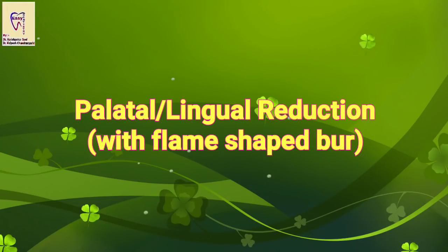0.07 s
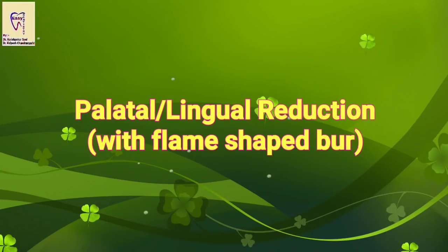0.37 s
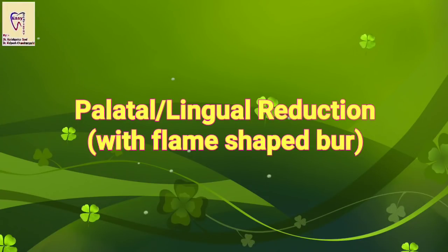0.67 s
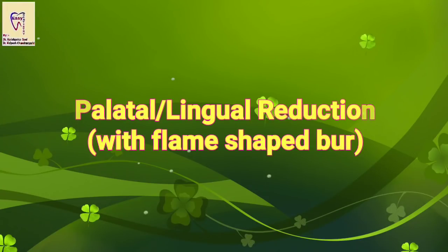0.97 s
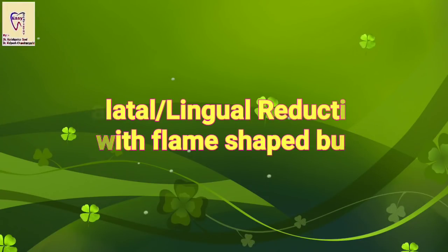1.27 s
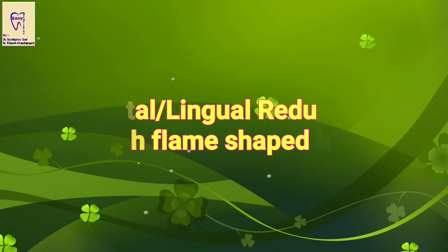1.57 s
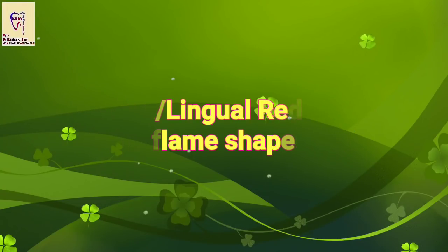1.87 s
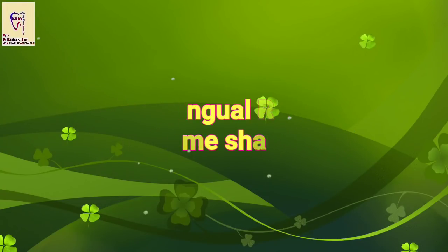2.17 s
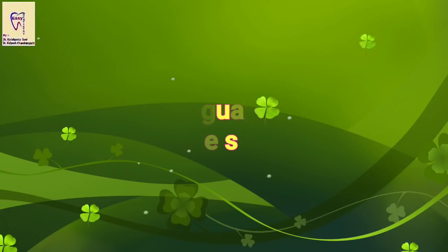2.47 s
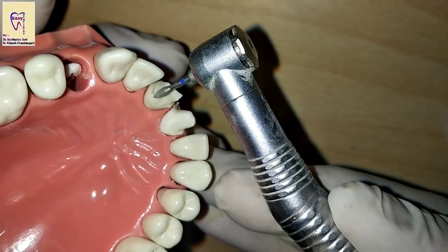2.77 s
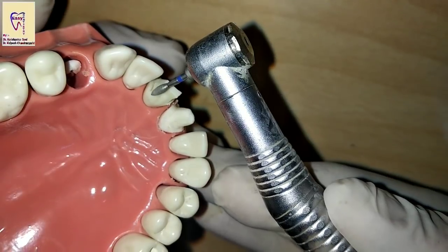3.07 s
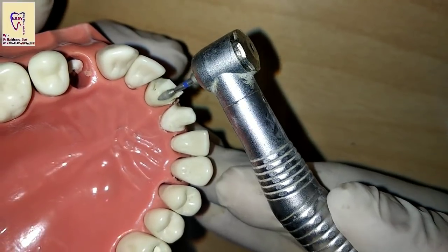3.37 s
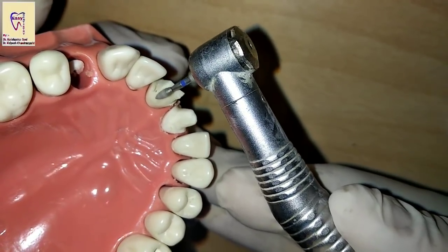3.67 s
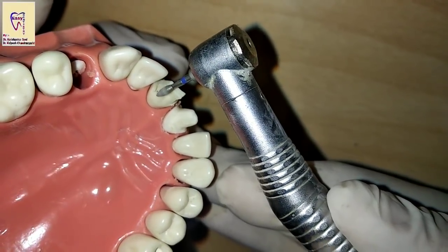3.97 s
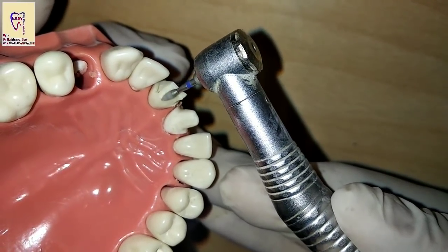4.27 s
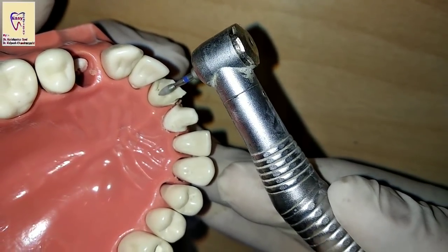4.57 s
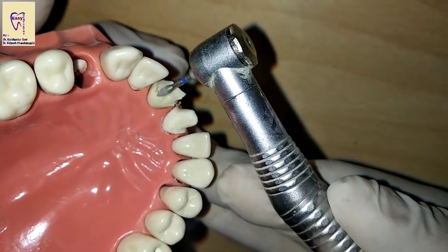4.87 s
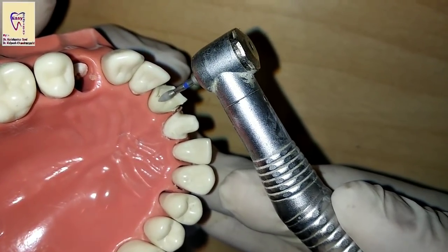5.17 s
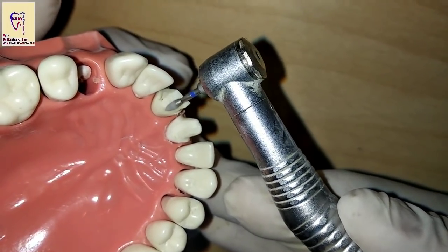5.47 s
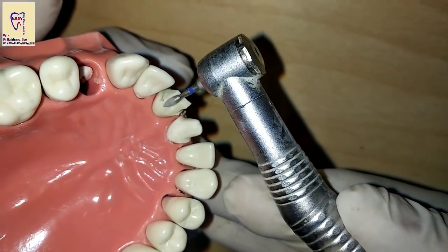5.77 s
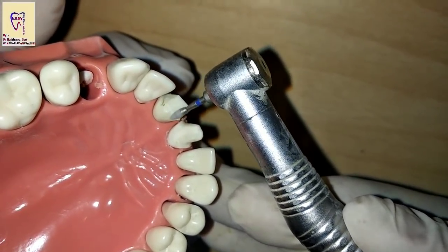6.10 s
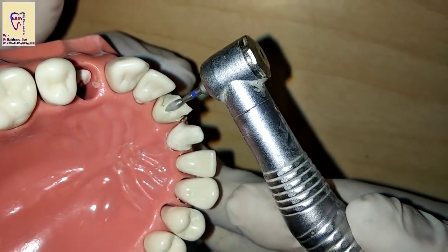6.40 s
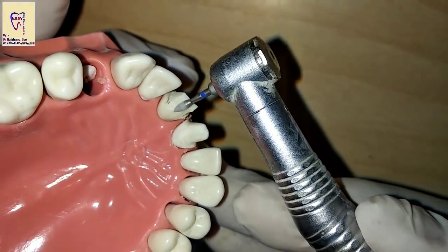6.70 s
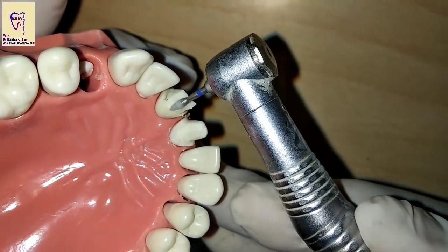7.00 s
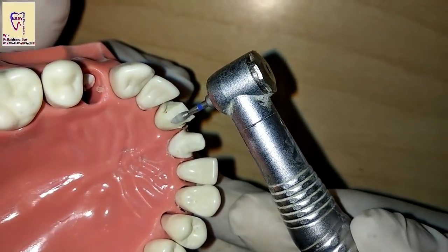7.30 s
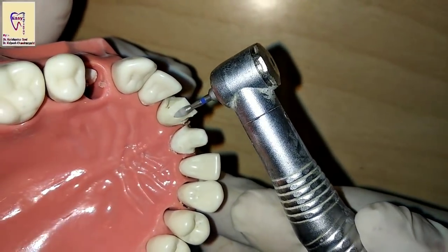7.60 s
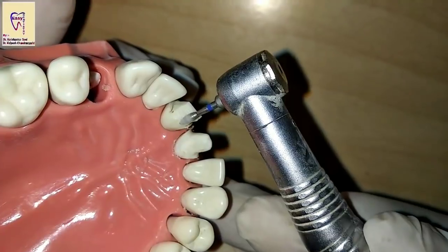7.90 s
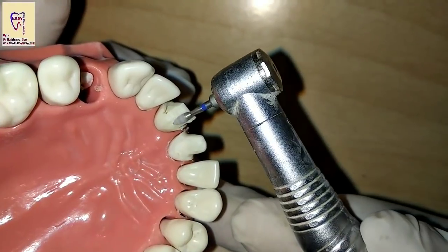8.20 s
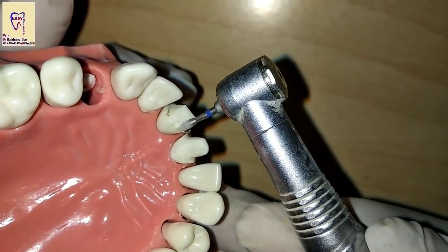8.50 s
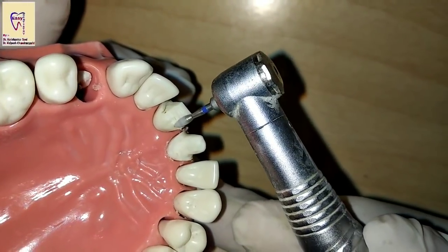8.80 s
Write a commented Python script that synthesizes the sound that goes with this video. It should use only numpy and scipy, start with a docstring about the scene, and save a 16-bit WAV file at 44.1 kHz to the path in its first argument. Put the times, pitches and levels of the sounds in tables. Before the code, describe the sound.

Close up in a small room, a faint hum and a few soft thumps give way to a dental drill spinning up with a loud, whistling hiss of air. Its high, wavering whine dips and recovers again and again, with brief squeals, as the bur scrapes a plastic model tooth. The hiss eases and the cutting becomes a harsh, rattling grind, with a low hum and rumble underneath at the end.

```python
"""A machine hums, with soft low thumps and a faint rustle; then an air-turbine dental handpiece spins up
and grinds a plastic tooth in a model jaw, close by in a small room. Rotor unbalance gives a whine that
sags each time the bur is pressed on, sweeping through the resonances of the metal head and flaring
briefly. Turbulent exhaust air hisses and whistles, impacts of grit excite the modes of tooth and jaw,
and the bur rattles. The hum fades before the drill starts and returns near the end."""
import sys
import numpy as np
from scipy import signal
from scipy.fft import rfft, irfft
from scipy.io import wavfile
from scipy.ndimage import uniform_filter1d

SR = 44100
rng = np.random.default_rng(int(sys.argv[2]) if len(sys.argv) > 2 else 0)


def store_pcm(level_fs):
    """Save levels as 16-bit WAV."""
    pcm = np.round(np.clip(level_fs, -1, 1) * 32767).astype(np.int16)
    wavfile.write(sys.argv[1], SR, np.atleast_2d(pcm).T)


N = 390285
TIME = np.arange(N) / SR


def undb(db):
    """Decibels to amplitude ratio."""
    return 10 ** (np.asarray(db) / 20)


def unit(x):
    """Normalisation to rms 1."""
    return x / np.sqrt(np.mean(x ** 2))


def curve(table, at=TIME):
    """Linear interpolation of a two-column table, by default over time."""
    return np.interp(at, *np.transpose(table))


def walk(rate):
    """Random modulation of rms 1, about rate turns a second."""
    levels = rng.standard_normal(N // 20)
    return unit(np.interp(2 * rate * TIME, np.arange(len(levels)), levels))


def colour(x, points):
    """Spectral shaping by (f/Hz, level/dB) points, rolled off below the first; rms 1."""
    hz, db = np.transpose(points)
    bins = np.maximum(np.arange(N // 2 + 1) * SR / N, 1)
    skirt = 1 / (1 + (hz[0] / bins) ** 3)
    gain = undb(np.interp(np.log(bins), np.log(hz), db))
    return unit(irfft(rfft(x) * skirt * gain, N))


def resonator(x, hz, width):
    """Second-order resonance with unit gain at its centre."""
    return signal.lfilter(*signal.iirpeak(hz, hz / width, SR), x)


def ring(x, modes):
    """Modal superposition: the direct sound plus each resonance it excites."""
    return x + sum(undb(db) * resonator(x, hz, width) for hz, width, db in modes)


def band(hz, width):
    """Narrow-band noise from two equal resonators in cascade; rms 1."""
    once = resonator(rng.standard_normal(N), hz, width)
    return unit(resonator(once, hz, width))


def grit(per_s, spread_db):
    """Shot noise: tiny impacts at random moments, most weak and a few strong."""
    hits = rng.random(N) < per_s / SR
    return unit(hits * rng.standard_normal(N) * undb(spread_db * rng.standard_normal(N)))


def shifting(x, spread_db, per_s, size):
    """Random spectral modulation: each narrow band swells and fades on its own; rms 1."""
    frames = dict(fs=SR, nperseg=size, noverlap=size * 3 // 4)
    _, t, bands = signal.stft(x, **frames)
    memory = np.exp(-2 * np.pi * per_s * t[1])
    kicks = uniform_filter1d(rng.standard_normal(bands.shape), size=3, axis=0)
    drift = unit(signal.lfilter([1], [1, -memory], kicks))
    gain = undb(spread_db * np.minimum(drift, 2))
    return unit(signal.istft(bands * gain, **frames)[1][:N])


# harmonics of the machine's shaft: order, level/dB
HUM_ORDERS = [(11, -8), (12, -8.5), (13, -9.5), (14, -22.5), (16, -35), (17, 6.5), (18, 7.5), (19, 2),
              (21, -5.5), (22, -6), (23, -32), (32, -38), (39, -41), (46, -49)]
# hum envelope: t/s, level/dB
HUM_LEVEL = [(0, -46), (.1, -44), (.36, -44.5), (.43, -50.5), (.55, -55.5), (.855, -56), (.865, -91),
             (1.0, -72), (1.4, -67), (7.55, -84), (7.75, -45.5), (7.95, -39.5), (8.3, -34), (8.85, -38.5)]

def hum(shaft_hz=22.47):
    """Periodic motion: a slow machine drones on harmonics of its shaft rate."""
    turn = 2 * np.pi * shaft_hz * TIME
    # odd harmonics lead by a quarter cycle, so the drone warbles more than it throbs
    drone = sum(undb(db) * np.sin(order * turn + order % 2 * np.pi / 2) for order, db in HUM_ORDERS)
    return unit(drone) * undb(curve(HUM_LEVEL) + 1.3 * walk(18))


# ambient spectrum: f/Hz, level/dB
ROOM_SPECTRUM = [(380, 3.5), (650, -6.5), (961, -12), (995, -31), (1040, -3), (1110, -14.5), (2390, -20.5),
                 (2920, -18), (3140, -20), (4980, -15.5), (5870, -31), (8890, -20.5), (11000, -43),
                 (14300, -77), (22000, -120)]
# ambient envelope: t/s, level/dB
ROOM_LEVEL = [(0, -63), (.46, -65), (.85, -65), (.87, -84), (.92, -82)]

def ambience():
    """Broadband noise floor of the quiet room."""
    noise = shifting(colour(rng.standard_normal(N), ROOM_SPECTRUM), spread_db=2, per_s=8, size=1024)
    return noise * undb(curve(ROOM_LEVEL) + 3.8)


# rumble spectrum: f/Hz, level/dB
RUMBLE_SPECTRUM = [(25, -54), (70, -56), (100, -5), (135, 2), (250, 2.5), (340, 1.5), (600, -8),
                   (1200, -80), (4000, -68)]
# rumble envelope: t/s, level/dB
RUMBLE_LEVEL = [(0.0, -58), (0.38, -68), (0.5, -73), (0.92, -101), (1.0, -59), (1.27, -44.5), (1.35, -69),
                (1.58, -85), (1.68, -49), (1.88, -53), (1.95, -102), (2.25, -100), (2.45, -55),
                (4.2, -57.5), (6.5, -57), (7.6, -54.5), (7.9, -33.5), (8.85, -42.5)]

def rumble():
    """Low-frequency noise of air and handling; the thud of each dig adds to it in power."""
    gain = np.hypot(undb(curve(RUMBLE_LEVEL)), dig_envelope(THUD_COLUMN)) * undb(2.2 * walk(25))
    noise = colour(rng.standard_normal(N), RUMBLE_SPECTRUM)
    return shifting(noise, spread_db=6.5, per_s=4.7, size=2048) * gain


# rustle spectrum: f/Hz, level/dB
RUSTLE_SPECTRUM = [(1500, -5), (2300, -2), (3200, -5), (5000, 3), (5900, -5), (7500, -13), (11000, -40)]
# rustle envelope: t/s, level/dB
RUSTLE_LEVEL = [(0, -64), (.12, -63), (.17, -71), (.27, -64), (.36, -64), (.45, -78), (.6, -110)]

def rustle():
    """Faint shot noise of handling as the handpiece is brought into place."""
    ticks = colour(grit(per_s=3000, spread_db=3), RUSTLE_SPECTRUM)
    flicker = shifting(ticks, spread_db=7, per_s=12, size=512)
    return flicker * undb(curve(RUSTLE_LEVEL) + 2 * walk(30))


# soft low thumps: t/s, level/dB, f/Hz
THUMPS = [(.01, -40, 218), (0.071, -38, 239), (0.271, -48, 247), (.79, -60, 156), (0.977, -51, 214),
          (1.08, -40, 152), (1.238, -58, 162), (1.422, -65, 153), (4.64, -34.5, 150), (4.861, -48, 145.3),
          (5.21, -35.5, 158), (6.772, -40, 120), (6.98, -46, 117), (7.272, -44, 123.4)]

def thumps(rise_s=0.006, t60=0.24):
    """Damped oscillation: each soft thump is one low, exponentially decaying tone."""
    out = np.zeros(N)
    for s, db, hz in THUMPS:
        age = np.maximum(TIME - s, 0)
        attack = 1 - np.exp(-age / rise_s)
        decay = undb(db - np.minimum(60 * age / t60, 200))
        out += attack * decay * np.sin(2 * np.pi * hz * age)
    return out


# hose modes: f/Hz, width/Hz, level/dB
HOSE_MODES = [(1690, 160, -0.5), (2390, 63, 0), (2690, 90, -7), (4200, 82, 3), (4950, 230, 0.5)]
# hose envelope: t/s, level/dB
HOSE_LEVEL = [(.9, -100), (.94, -60), (1.05, -35.5), (1.28, -42), (1.42, -50), (1.6, -100)]

def hose():
    """Air-column resonance: the hose rings hollow as it fills."""
    modes = sum(undb(db) * band(hz, width) for hz, width, db in HOSE_MODES)
    return unit(modes) * undb(curve(HOSE_LEVEL))


# jet spectrum: f/Hz, level/dB
AIR_SPECTRUM = [(300, -21.5), (700, -9.5), (1100, -17.5), (1700, -3.5), (2400, -12.5), (3100, -10),
                (4200, -3.5), (5400, -15.5), (6600, -6), (7400, -5), (7900, 7), (9200, 6.5), (10000, 0),
                (11200, -22)]
# air flow through the head: t/s, level/dB
AIR_LEVEL = [(0.905, -85), (0.925, -54), (1.0, -35), (1.2, -27), (2.2, -26), (3.1, -23.5), (3.33, -26.5),
             (3.42, -33), (6.6, -33), (6.76, -37), (6.95, -35.5), (8.85, -39)]

def exhaust(load, stall_db=4.5):
    """Turbulent jet noise: more air spills from the head as the rotor slows."""
    jet = shifting(colour(rng.standard_normal(N), AIR_SPECTRUM), spread_db=3.2, per_s=16, size=512)
    gust_db = .7 * walk(30)
    return jet * undb(curve(AIR_LEVEL) + stall_db * load - 3 + gust_db)


# modes of the head's air passages: f/Hz, width/Hz, level/dB
PORT_MODES = [(2145, 60, -4), (2315, 90, 0), (3550, 90, -2), (3690, 50, -4), (3960, 120, -3),
              (4220, 60, -8), (4410, 60, -6), (4660, 70, -10), (5580, 70, -16)]
# their envelope: t/s, level/dB
PORTS_LEVEL = [(.92, -77.5), (1.2, -37.5), (1.5, -32.5), (3.0, -35.5), (3.5, -43), (4.0, -49.5),
               (8.85, -41.5)]

def ports():
    """Cavity resonance: the flow rings the passages of the head."""
    modes = sum(undb(db + 2.5 * walk(8.8)) * band(hz, width) for hz, width, db in PORT_MODES)
    return unit(modes) * undb(curve(PORTS_LEVEL))


# whistle envelope: t/s, level/dB
WHISTLE_LEVEL = [(.92, -84), (1.05, -52), (1.35, -43), (1.55, -36.5), (1.85, -33), (2.1, -37), (3.1, -39),
                 (3.4, -48.5), (8.85, -53)]

def whistle():
    """Narrow-band flow noise: air leaving the head gives a breathy pitch."""
    return band(hz=6935, width=230) * undb(curve(WHISTLE_LEVEL) + 2.1 * walk(12))


FREE_HZ = 4685  # unloaded rotor speed
# presses of the bur: deepest t/s, sag/Hz, lean-in/s, ease-off/s, whine gain/dB, contact/dB, overtones/dB
PRESSES = [(3.312, 1501, 0.203, 0.13, 11.5, -67, -65), (3.66, 84.9, .11, .11, 0, -60, -66),
           (4.25, 1516, 0.3, 0.092, 4, -49, -71), (4.657, 1775, 0.17, 0.13, -10, -61, -52),
           (5.067, 1445, 0.19, 0.096, 0, -67, -56), (5.47, 1455, 0.31, 0.09, -2.5, -45, -49.5),
           (5.892, 540.0, 0.079, 0.041, 10, -58, -66), (6.107, 3408, 0.35, 0.11, 0, -63, -61.5),
           (6.809, 3201, 0.27, 0.128, -4, -25.5, -46.5), (7.41, 3065, 0.222, 0.11, -15, -25.5, -50),
           (7.947, 2720.0, 0.19, 0.1, 3.5, -24, -48), (8.505, 3854, 0.24, 0.17, 9, -26, -47),
           (8.996, 2893, 0.093, 0.1, 4, -38.0, -46)]

def leaning(press, lean_power=1.756, ease_power=1.408):
    """Contact force of one press, 0-1: a rounded lean into the tooth and a sharper release."""
    s, _, lean_s, ease_s = press[:4]
    lean = abs((TIME - s) / lean_s) ** lean_power
    ease = abs((TIME - s) / ease_s) ** ease_power
    return np.exp(-np.where(TIME < s, lean, ease))


def rotor_speed(pressure, start_s=0.92, spin_up_s=0.254):
    """Drive against load: air spins the rotor up and each press slows it; speed in Hz."""
    age = np.maximum(TIME - start_s, 0)
    unloaded_hz = FREE_HZ * (1 - np.exp(-(age / spin_up_s) ** 2.04))
    sag_hz = np.transpose(PRESSES)[1]
    return np.maximum(unloaded_hz - sag_hz @ pressure, 1)


def labouring(speed_hz):
    """Roughness of running, 0-1: modulation deepens as the rotor slows."""
    return np.clip(1 - speed_hz / 3800, 0, 1)


# unbalance response, peaking at the critical speeds: speed/Hz, level/dB
WHINE_BY_SPEED = [(300, -92), (1500, -45.5), (2300, -83), (2950, -42), (3200, -88), (3550, -36),
                  (3750, -35), (3950, -31.5), (4250, -31.5), (4430, -49), (4560, -65), (4700, -73)]
# overtone gain while the bur barely touches: t/s, level/dB
LIGHT_TOUCH = [(0.92, -66), (1.1, -5), (1.3, -4), (1.5, -18), (2.8, -19), (3.0, -13)]

def tone_levels(speed_hz, pressure, bite_hz_per_s=12000):
    """Fundamental and overtone levels in dB; unbalance and contact add in power in the fundamental."""
    s, *_, whine_db, contact_db, overtone_db = np.transpose(PRESSES)
    # positive while the bur bites and slows, negative while it recovers
    bite_db = 4.5 * np.tanh(-np.gradient(speed_hz) * SR / bite_hz_per_s)
    unbalance = undb(curve(WHINE_BY_SPEED, speed_hz) + np.interp(TIME, s, whine_db))
    radiated = undb(np.interp(speed_hz, [1100, 1750], [-24, 0]))  # the head is too small for low tones
    contact = undb(contact_db) @ pressure * undb(bite_db / 2) * radiated
    fundamental_db = 20 * np.log10(np.hypot(unbalance, contact))
    return fundamental_db, np.interp(TIME, s, overtone_db) + bite_db + curve(LIGHT_TOUCH)


# radiation of overtones by the head: f/Hz, level/dB
RADIATION = [(2000, -5), (3600, -9), (4850, 9), (5400, 12), (5950, 20), (6500, 15), (7050, 19), (7600, 14),
             (8200, 21), (8900, 18), (9450, 20), (10400, 3), (13500, -90)]
# modes of the metal head: f/Hz, width/Hz, level/dB re direct sound
HEAD_MODES = [(2010, 37, -13), (3695, 21, 8), (3910, 19, 5), (5750, 55, 7.5), (6160, 120, -9),
              (7250, 81, 7.5), (8800, 40, 6.5)]

def whine(speed_hz, phase, fundamental_db, overtone_db):
    """Forced vibration: the unbalance tone and contact overtones flare as they cross the head's modes."""
    labour = labouring(speed_hz)
    shake_db = (3.6 + 4 * labour) * walk(55) + (1.3 + 2 * labour) * walk(260)
    skid = (.17 + 1.2 * labour) * walk(250)
    tone = undb(fundamental_db - 4.5 - 3.5 * labour + shake_db) * np.sin(phase + skid)
    pressed_db = overtone_db + 6 * labour - .5
    for order in range(2, 10):
        radiation_db = curve(RADIATION, order * speed_hz) - 1.6 * max(order - 5, 0)
        flutter_db = 8 * np.tanh(walk(60))
        rasp = (.85 + .5 * labour) * walk(340)
        tone += undb(pressed_db + radiation_db + flutter_db) * np.sin(order * phase + rasp)
    return ring(tone, HEAD_MODES)


# modes of tooth and jaw: f/Hz, width/Hz, level/dB re direct sound
JAW_MODES = [(513, 580, -8.5), (886, 47, 12.5), (1613, 34, 10), (1944, 62, 13), (2126, 47, 12.5),
             (2362, 71, 13.5), (2590, 110, 10.5), (2938, 16, 14), (3197, 24, 10.5), (3362, 20, 17),
             (3603, 38, 10.5), (3630, 29, 9.5), (3900, 60, 13.5), (4320, 92, 10), (4530, 47, 2.5),
             (4530, 96, 15), (5015, 63, 11), (5450, 95, 10.5), (5870, 190, 6.5), (6130, 70, 12),
             (7030, 330, 9)]
# scraping spectrum: f/Hz, level/dB
CUT_SPECTRUM = [(200, -55), (450, 4.5), (850, -3.5), (1100, -3.5), (1650, 3), (2250, 0), (2900, 4.5),
                (3700, 3.5), (4400, 0.5), (5100, -3), (7000, -40), (11000, -50)]
# steady contact of grit and tooth: t/s, level/dB
CUT_LEVEL = [(0.92, -64), (1.02, -23), (1.2, -31.5), (1.35, -35.5), (2.4, -32), (3.2, -28.5), (3.7, -33.5),
             (4.05, -36.5), (6.67, -31.5), (6.72, -25), (7.25, -28.5), (8.85, -20)]

def cutting(phase, load, stall_db=-28.5):
    """Abrasion: diamond grit rings the jaw, hardest once a turn; a slowed bur grinds off less."""
    scrape = grit(per_s=9000, spread_db=3) * (1 + .4 * np.sin(phase)) * undb(1.3 * walk(55))
    jaw = ring(colour(scrape, CUT_SPECTRUM), JAW_MODES)
    moving_contact = shifting(jaw, spread_db=10, per_s=6.4, size=1024)
    return moving_contact * undb(curve(CUT_LEVEL) + stall_db * load - 3)


# spectrum of the bouncing bur: f/Hz, level/dB
RATTLE_SPECTRUM = [(300, 6), (600, -46), (880, -16), (1150, -11), (1600, -13.5), (2100, -5.5), (2700, -10),
                   (3300, 1.5), (4200, -11.5), (5000, 4.5), (5600, 7.5), (6200, 3.5), (7100, 0), (7600, -8),
                   (8300, -0.5), (9500, 0), (11000, -30)]
# bouncing, slight at first and hard late on: t/s, level/dB
RATTLE_LEVEL = [(0.92, -82), (1.05, -60), (2.95, -58), (3.16, -36.5), (3.4, -45.5), (6.665, -43.5),
                (6.705, -25.5), (7.05, -29), (7.2, -32), (7.5, -30.5), (7.61, -38), (7.72, -30),
                (7.86, -35), (7.96, -22.5), (8.17, -24.5), (8.56, -23.5), (8.85, -31)]

def rattle(load, stall_db=8):
    """Impact excitation: the bur bounces on the tooth in uneven flurries, harder under load."""
    knocks = grit(per_s=8000, spread_db=1.5) * undb(1.2 * walk(50))
    jaw = ring(colour(knocks, RATTLE_SPECTRUM), JAW_MODES)
    jangle = shifting(jaw, spread_db=6, per_s=7, size=1024)
    return jangle * undb(curve(RATTLE_LEVEL) + stall_db * load - 4)


# brief flares of the whine or one overtone (spin-up whistle, ringing through resonances, squeals):
# t/s, approximate f/Hz, level/dB, nominal half length/s
FLARES = [(1.075, 1400, -53, 0.0064), (1.1, 1900, -36.5, 0.0057), (1.137, 2400, -46, 0.0069),
          (1.157, 2900, -52, 0.0068), (1.208, 3400, -33, 0.0049), (1.224, 3600, -20, 0.0039),
          (1.256, 7900, -27, .007), (1.261, 4000, -26, 0.0049), (1.3, 4250, -34, 0.0034),
          (1.355, 4450, -25.5, 0.01), (1.38, 9000, -22.5, 0.017), (3.052, 4450, -34, 0.0055),
          (3.137, 4000, -18, 0.0075), (3.205, 3700, -28, 0.022), (3.23, 7000, -25, 0.018),
          (3.3, 6300, -42, 0.016), (3.316, 9500, -23, .008), (3.422, 8000, -36, .012),
          (3.538, 4450, -28, 0.014), (3.585, 4500, -31.5, 0.011), (3.63, 4500, -40, .012),
          (3.696, 4500, -36.5, 0.011), (3.749, 4500, -41, 0.015), (3.823, 4500, -43, 0.01),
          (3.901, 8900, -28.5, 0.026), (3.998, 3950, -16, 0.0072), (4.02, 3900, -24, 0.0027),
          (4.003, 7900, -33, .011), (4.117, 7100, -31.5, 0.011), (4.238, 9500, -30, 0.0084),
          (4.426, 8600, -32, 0.011), (4.342, 4000, -30.5, 0.01), (4.488, 3950, -16, 0.0095),
          (4.509, 3900, -22, 0.0024), (4.53, 3750, -25, 0.0039), (4.552, 3600, -28.5, 0.0047),
          (4.554, 7000, -21, 0.0025), (4.612, 9200, -21.5, 0.0013), (4.626, 9000, -25.5, 0.0072),
          (4.654, 2950, -32, 0.02), (4.684, 9100, -30.5, 0.0068), (4.801, 3900, -27.5, 0.0024),
          (4.811, 3900, -29, 0.0055), (4.854, 3950, -24, 0.028), (5.014, 9600, -25, .0018),
          (5.026, 9300, -28, .004), (5.065, 6100, -40, 0.018), (5.094, 9500, -33, 0.011),
          (5.206, 3750, -32, 0.023), (5.259, 3700, -30.5, 0.016), (5.334, 6900, -28.5, 0.0063),
          (5.368, 6700, -32, .005), (5.428, 9400, -32, .012), (5.468, 6100, -34, 0.0097),
          (5.591, 3900, -20.5, 0.0097), (5.624, 3900, -30, 0.0041), (5.74, 7100, -37, 0.014),
          (5.805, 9000, -33, .012), (5.809, 2900, -32, 0.0029), (5.83, 7900, -32, .007),
          (5.831, 2650, -28.5, 0.0093), (5.844, 5000, -29, 0.0063), (5.853, 7200, -29, 0.0058),
          (5.856, 2350, -23, 0.0038), (5.868, 4600, -38, .008), (5.873, 6900, -33, 0.006),
          (5.881, 8300, -31, 0.0067), (5.929, 9500, -30, 0.011), (5.934, 3850, -32, 0.019),
          (5.993, 7000, -29, 0.0064), (6.012, 1600, -39, 0.02), (6.034, 4600, -41, 0.021),
          (6.043, 8500, -27.5, .005), (6.068, 3950, -37, 0.0072), (6.112, 3900, -29, 0.0059),
          (6.249, 3700, -31.5, 0.0076), (6.281, 4000, -20, 0.0037), (6.492, 3950, -18.5, 0.0066),
          (6.515, 3800, -29.5, 0.0062), (6.625, 8200, -24, 0.0063), (6.655, 4900, -25, 0.0057),
          (6.658, 7100, -29, 0.004), (6.705, 3960, -26, 0.0043), (6.714, 1900, -24, 0.004),
          (6.715, 5650, -18.5, 0.0077), (6.724, 7000, -32, 0.017), (6.757, 3250, -33.5, 0.0073),
          (6.762, 8200, -33, 0.0081), (6.764, 9600, -31, 0.0083), (6.776, 4750, -32, .008),
          (6.797, 1530, -32.5, 0.012), (6.804, 8960, -21.5, 0.0031), (6.807, 5940, -17.5, 0.0038),
          (6.813, 5940, -22, 0.0054), (6.857, 2000, -30, 0.0095), (6.952, 3600, -22.5, 0.0021),
          (6.96, 3700, -28, .004), (6.995, 4030, -26, 0.0053), (7.006, 8100, -34.5, 0.013),
          (7.043, 4150, -23.5, 0.01), (7.066, 8200, -46, 0.012), (7.143, 3790, -26, 0.008),
          (7.246, 6100, -30, 0.01), (7.252, 8700, -32, 0.0057), (7.253, 2930, -30, .006),
          (7.28, 7750, -28, 0.0037), (7.323, 2130, -26.5, 0.0067), (7.331, 6450, -31, 0.0043),
          (7.355, 1890, -50, 0.0021), (7.357, 5730, -26, 0.0035), (7.388, 5080, -27, 0.0047),
          (7.398, 6370, -28, 0.0062), (7.486, 5960, -31, .005), (7.539, 7340, -35, 0.0034),
          (7.54, 3700, -22.5, 0.0032), (7.56, 3880, -33, 0.0036), (7.57, 7900, -35, 0.011),
          (7.654, 4130, -35, .018), (7.666, 8200, -41, 0.013), (7.728, 3790, -27.5, 0.0082),
          (7.83, 3190, -29, 0.011), (7.837, 5880, -36, 0.006), (7.841, 8310, -28, 0.0085),
          (7.876, 2370, -22, 0.0032), (7.897, 2130, -19, 0.0031), (7.917, 7990, -26, 0.0058),
          (7.932, 3900, -26, 0.0063), (7.97, 9020, -31, 0.0074), (8.018, 6160, -17.5, 0.0052),
          (8.046, 3400, -44, 0.0068), (8.05, 7080, -28, 0.0076), (8.066, 3700, -29, 0.0045),
          (8.096, 3880, -23.5, 0.005), (8.148, 7920, -32, .016), (8.238, 7240, -23.5, 0.01),
          (8.242, 3530, -22, 0.0041), (8.271, 3290, -24, 0.011), (8.289, 6030, -22.5, 0.009),
          (8.312, 8290, -28, 0.008), (8.337, 4910, -23, 0.0045), (8.338, 2390, -25, 0.0075),
          (8.364, 6220, -18, 0.004), (8.398, 1640, -27, 0.003), (8.405, 9430, -31, 0.0046),
          (8.431, 6200, -23, 0.0054), (8.45, 4570, -23.5, 0.0057), (8.466, 6140, -37.5, 0.0042),
          (8.492, 3700, -35, 0.011), (8.529, 4440, -22, 0.0066), (8.548, 5940, -22, 0.0053),
          (8.566, 3290, -34, 0.0068), (8.568, 7110, -22, .005), (8.578, 5770, -25, 0.0074),
          (8.598, 2200, -24.5, 0.0046), (8.646, 5960, -28, 0.0071), (8.672, 3340, -26, 0.0044),
          (8.694, 7170, -27.5, 0.012), (8.715, 3880, -29, .005), (8.74, 4050, -35, 0.0049)]

def flares(speed_hz, phase, rise=1.25, fall=.8):
    """Amplitude modulation: one harmonic of the rotor swells briefly and falls away faster."""
    out = np.zeros(N)
    labour = labouring(speed_hz)
    rasp = (.23 + .2 * labour) * walk(380)
    grain = undb((1.1 + 5 * labour) * walk(170) - 2 * labour)
    for s, near_hz, db, length in FLARES:
        order = max(round(near_hz / np.interp(s, TIME, speed_hz)), 1)
        near = abs(TIME - s) < 5 * length
        age = (TIME[near] - s) / length
        swell = np.exp(-.5 * (age / np.where(age < 0, rise, fall)) ** 2)
        harmonic = np.sqrt(2) * np.sin(order * phase[near] + min(order, 4) * rasp[near])
        out[near] += undb(db) * swell * harmonic
    return out * grain


# whirl response: speed/Hz, level/dB
WHIRL_BY_SPEED = [(3400, -91), (3900, -53), (4300, -50), (4600, -56), (4680, -45)]

def whirl(speed_hz, phase):
    """Half-speed whirl: near top speed the shaft orbits in its bearings, an octave under the whine."""
    flutter_db = 3.5 * walk(60)
    skid = .8 * walk(130)
    return undb(curve(WHIRL_BY_SPEED, speed_hz) + flutter_db) * np.sin(phase / 2 + skid)


# deep bites of the bur: t/s, half length/s, rasp/dB, scrape/dB, thud/dB, scrape's low f/Hz, high f/Hz
DIGS = [(1.244, 0.0083, -34, -32, -40, 1500, 4200), (1.297, 0.014, -50, -27, -53, 1700, 3430),
        (1.695, 0.041, -38.5, -32.5, -54, 1600, 4170), (3.17, 0.054, -39, -37, -46, 1550, 3600),
        (3.593, 0.075, -47, -33.5, -56, 2010, 3200), (4, 0.012, -44, -48, -46, 1600, 4200),
        (4.443, 0.0087, -50, -35.5, -43, 1900, 2770), (4.502, 0.021, -40.5, -39, -53, 1900, 4610),
        (4.643, 0.019, -56, -31.5, -45.5, 2100, 3000), (4.83, 0.033, -42, -49, -48, 1590, 3270),
        (5.04, 0.03, -44, -38.5, -66, 1930, 3300), (5.236, 0.035, -49.5, -47, -56, 1391, 2360),
        (5.597, 0.037, -46, -61, -60, 1600, 4200), (5.822, 0.029, -43, -44, -44, 1600, 4200),
        (6.362, 0.034, -43.5, -29.5, -49, 1633, 2830), (7.051, 0.016, -64, -28.5, -46, 1801, 2460),
        (7.616, 0.032, -69, -20.5, -47, 1570, 5540), (8.803, 0.024, -25.5, -20.5, -30.5, 1520, 4209)]
RASP_COLUMN, SCRAPE_COLUMN, THUD_COLUMN = 2, 3, 4

def digs():
    """Local modal excitation: a deep bite rasps, rings the modes under it and booms the hollow jaw."""
    rasp_spectrum = [(330, -.5), (480, 7.5), (680, 2.5), (880, -4), (1100, -4.5), (1700, 4.5), (5000, -62)]
    out = dig_envelope(RASP_COLUMN) * colour(grit(per_s=6000, spread_db=2.5), rasp_spectrum)
    coarse = grit(per_s=2600, spread_db=3.5) * undb(2.2 * walk(75))
    scrape = shifting(ring(coarse, JAW_MODES), spread_db=5.5, per_s=5, size=1024)
    for s, length, _, scrape_db, _, low_hz, high_hz in DIGS:
        near = abs(TIME - s) < 5 * length
        passband = signal.butter(3, [low_hz, high_hz], "bandpass", fs=SR, output="sos")
        spot = unit(signal.sosfilt(passband, scrape[near]))
        out[near] += undb(scrape_db) * spot * np.exp(-.5 * ((TIME[near] - s) / length) ** 2)
    hollow = undb(-17) * dig_envelope(SCRAPE_COLUMN) * band(hz=865, width=120)
    return out + hollow


def dig_envelope(column):
    """Sum of Gaussian pulses, one a dig, at the levels of one column."""
    return sum(undb(row[column]) * np.exp(-.5 * ((TIME - row[0]) / row[1]) ** 2) for row in DIGS)


def room(x, wet_db, t60):
    """Reverberation: a short diffuse tail from the table and nearby walls."""
    t = TIME[:SR // 3]
    tail = rng.standard_normal(len(t)) * undb(-60 * t / t60) * (t > .003)
    return x + undb(wet_db) * signal.fftconvolve(x, tail / np.linalg.norm(tail))[:N]


def scene():
    """Superposition of drill and background; the rotor's load steers exhaust, cutting and rattle."""
    pressure = np.array([leaning(press) for press in PRESSES])
    speed_hz = rotor_speed(pressure)
    load = 1 - speed_hz / FREE_HZ  # 0 running free, 1 at rest
    jittered_hz = speed_hz * (1 + .0015 * walk(60) + .003 * walk(500))
    phase = 2 * np.pi * np.cumsum(jittered_hz) / SR
    tones = whine(jittered_hz, phase, *tone_levels(speed_hz, pressure))
    tones += flares(speed_hz, phase) + whirl(speed_hz, phase)
    air = exhaust(load) + ports() + whistle() + hose()
    grinding = cutting(phase, load) + rattle(load) + digs()
    drill = room(tones + air + grinding, wet_db=-11, t60=0.08)
    return (drill + rumble() + thumps() + rustle() + ambience() + hum())[None]


def record(dry):
    """Soft saturation rounds the loudest peaks; a steep low-pass cuts the top."""
    ceiling, top_hz = .6, 11200
    lowpass = signal.ellip(12, .2, 100, top_hz, fs=SR, output="sos")
    return signal.sosfilt(lowpass, ceiling * np.tanh(dry / ceiling))


dry = scene()
out = record(dry)
store_pcm(out)
```